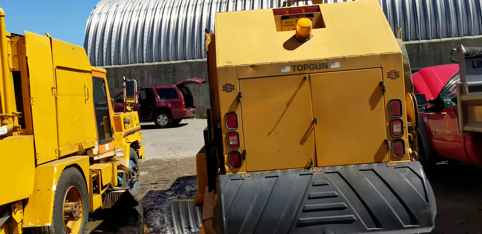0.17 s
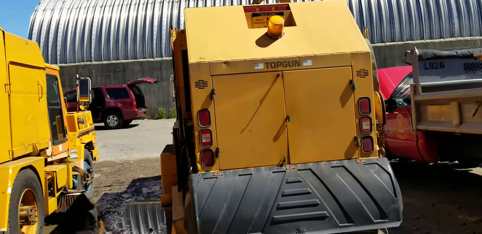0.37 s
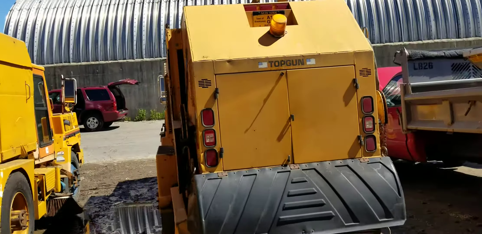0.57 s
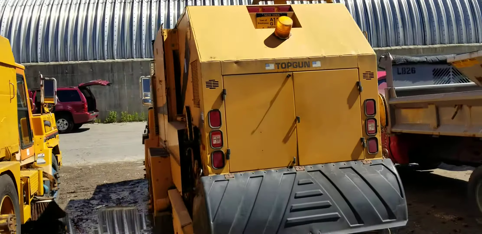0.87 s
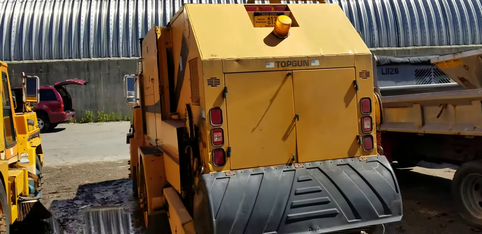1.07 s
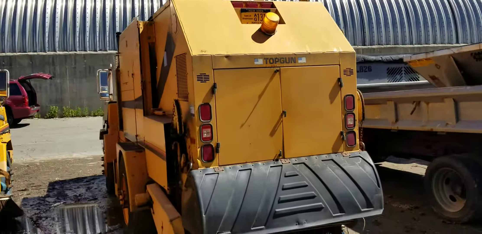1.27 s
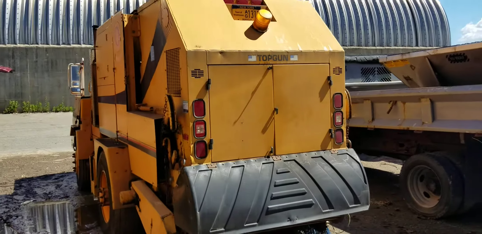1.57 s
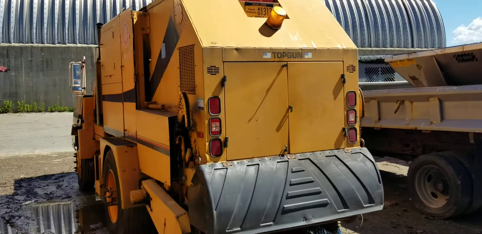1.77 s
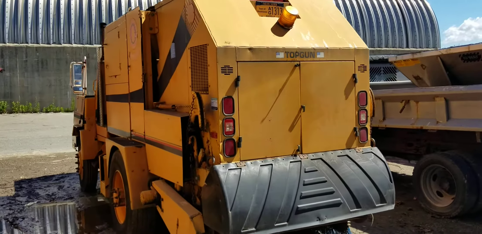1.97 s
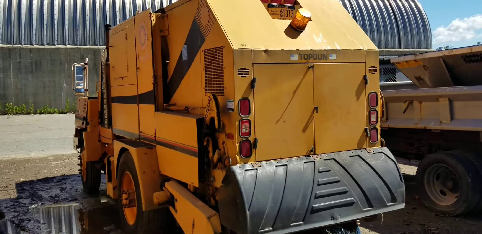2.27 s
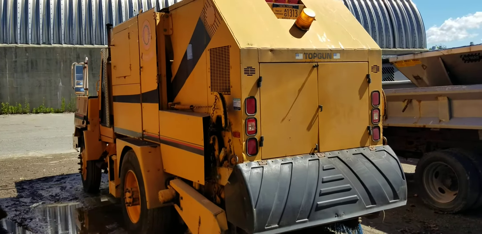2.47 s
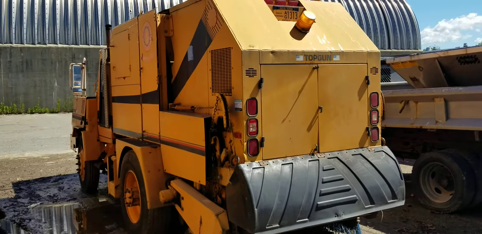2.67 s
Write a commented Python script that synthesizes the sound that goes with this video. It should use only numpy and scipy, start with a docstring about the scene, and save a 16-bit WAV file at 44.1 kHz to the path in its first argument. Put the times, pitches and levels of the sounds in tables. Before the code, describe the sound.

A steady diesel idle rumbles close by among parked street sweepers, with a second engine knocking to the right over fan noise. One short hiss of air escapes, followed by two faint puffs, while the microphone moves through the yard.

```python
"""Two diesels idling in a yard

Beside parked street sweepers, one engine throbs through its exhaust as its speed hunts slowly up and down.
To the right a steadier eight-cylinder knocks and clatters, louder as the microphone moves past.
Fan noise and yard echo lie behind them, and a few light ticks sound nearby.
Air escapes in one long hiss and two faint puffs."""
import sys
import numpy as np
from scipy import signal
from scipy.fft import rfft, irfft, next_fast_len
from scipy.io import wavfile

SR = 44100
rng = np.random.default_rng(int(sys.argv[2]) if len(sys.argv) > 2 else 0)


def generate_wav(signal):
    """Clip the signal to [-1, 1] and save it as 16-bit WAV at the path in sys.argv[1]."""
    frames = np.transpose(np.atleast_2d(signal))
    scaled = np.clip(frames, -1, 1) * 32767
    pcm = np.round(scaled).astype(np.int16)
    wavfile.write(sys.argv[1], SR, pcm)


N = 123921
TIME = np.arange(N) / SR
FFT_SIZE = next_fast_len(N)
BIN_HZ = np.fft.rfftfreq(FFT_SIZE, 1 / SR)


def amp(db):
    """Decibels to gain."""
    return 10 ** (np.asarray(db) / 20)


def unit(x):
    """Scales to rms 1."""
    return x / np.sqrt(np.mean(x ** 2) + 1e-20)


def curve(rows):
    """Joins (time, value) rows by straight lines."""
    return np.interp(TIME, *np.transpose(rows))


def bell(peak_s, spread_s):
    """A swell that peaks at 1 and is down to 1/e one spread either side."""
    return np.exp(-((TIME - peak_s) / spread_s) ** 2)


def over_bins(rows):
    """Reads (frequency, value) rows at every frequency bin."""
    hz, value = np.transpose(rows)
    return np.interp(np.log(BIN_HZ + 1), np.log(hz), value)


def filtered(x, gain):
    """Applies one gain per frequency bin."""
    return irfft(rfft(x, FFT_SIZE) * gain, FFT_SIZE)[..., :N]


def colour(x, spectrum, pan=((1, 0), (2, 0))):
    """Gives a sound its spectrum and left-right balance, at rms 1."""
    side = over_bins(pan) / 2
    return unit(filtered(x, amp(over_bins(spectrum) + np.array([side, -side]))))


def drift(hz):
    """Random wandering of rms 1, up to the given rate."""
    t = np.linspace(0, N / SR, 600)
    rates, phases = hz * rng.random((24, 1)), rng.random((24, 1))
    return np.interp(TIME, t, unit(np.sin(2 * np.pi * (rates * t + phases)).sum(0)))


def add(mix, s, sound):
    """Mixes a sound in at a time."""
    part = mix[..., max(round(s * SR), 0):][..., :sound.shape[-1]]
    part += sound[..., :part.shape[-1]]


def tone(turns):
    """A sine of rms 1 with a random start."""
    return np.sqrt(2) * np.sin(2 * np.pi * (turns + rng.random()))


def reflected(x, depth_db=0.83, band_hz=70):
    """Reflections off nearby panels raise and lower narrow bands above the bass."""
    ripple = np.interp(BIN_HZ / band_hz, np.arange(1024), rng.standard_normal(1024))
    return filtered(x, amp(depth_db * ripple * np.minimum(BIN_HZ / 2000, 1)))


# speed of the hunting engine (time [s], four-stroke cycle rate [Hz])
CYCLE_RATE = [(0.0, 9.775), (0.17, 9.762), (0.62, 9.483), (1.0, 9.705), (1.36, 9.933), (1.65, 9.751),
              (1.95, 9.525), (2.3, 9.762), (2.6, 9.907), (2.8, 9.768)]
# exhaust tones that swell and fade as the microphone moves
# (order [multiple of the cycle rate], peak level [dB], peak time [s], spread [s])
EXHAUST_TONES = [(4,-40,1.4,1),(6,-37,1.7,.3),(7,-46,.5,2),(8,-36,.4,.4),(10,-30,.1,.9),(11,-33.5,.4,1.2),(12,-35,2.7,1.2),(15,-37,1.9,.4),(16,-39,1.2,2),(17,-47,1.6,2),(18,-44,1.2,2),(19,-36,2.7,.35),(20,-40,2.3,2),(22,-42,1.3,1),(23,-43,1.1,.6),(24,-42,1.6,2),(25,-38,.6,.55),(26,-44,0,.3),(27,-42,2.15,.35),(28,-52,1.1,2),(32,-54,1.3,2),(33,-46,.9,.45),(35,-47,1.6,.3),(37,-45,1.9,.25),(38,-49,.1,.3)]
# boom of the pipe (time [s], level of order 9 [dB], level of order 13 [dB], level of order 14 [dB])
PIPE_BOOM = [(0,-31.5,-25,-39),(.35,-31,-24.5,-35),(.55,-29,-20.5,-34),(1.0,-30,-23.5,-33.5),(1.22,-32,-25,-33),(1.45,-33.5,-28,-41),(1.75,-32.5,-25.5,-41),(2.1,-30,-29.5,-45),(2.3,-30.5,-22.5,-44),(2.8,-32,-23,-40)]
BOOM_ORDERS, IN_STEP_ORDERS = (9, 13, 14), (12, 13, 14)
# turbulent exhaust flow (frequency [Hz], relative level [dB])
RUMBLE_SPECTRUM = [(20,-44),(30,-25),(42,-2),(60,3),(100,-9),(150,2),(230,-11.5),(290,-10),(350,-11.5),(480,-17.5),(800,-29),(2000,-69)]

def hunting_engine(strong_firing_s=0.09, fade_db=-10.5, rumble_db=-32, puff_depth=0.44, width=0.35):
    """Centre: uneven firings give tones over puffs of gas; those near pipe resonance throb each cycle."""
    cycles = np.cumsum(curve(CYCLE_RATE)) / SR - strong_firing_s * CYCLE_RATE[0][1]
    times, *levels = np.transpose(PIPE_BOOM)
    loud = [(order, np.interp(TIME, times, db)) for order, db in zip(BOOM_ORDERS, levels)]
    soft = [(order, db + fade_db * (1 - bell(s, spread))) for order, db, s, spread in EXHAUST_TONES]
    tones = np.zeros(N)
    for order, db in loud + soft:
        turns = order * cycles
        wave = np.sqrt(2) * np.cos(2 * np.pi * turns) if order in IN_STEP_ORDERS else tone(turns)
        tones += amp(db) * wave
    gas, side = rng.standard_normal((2, N))
    firing = np.cos(8 * np.pi * cycles)  # four firings a cycle
    puffs = (1 + puff_depth * firing) * (gas + width * np.array([side, -side]))
    return amp(1.07 * drift(hz=16)) * tones + amp(rumble_db) * colour(puffs, RUMBLE_SPECTRUM)


FIRING_HZ = 46.848
FIRINGS = int(N / SR * FIRING_HZ) + 1
# hum of the eight-cylinder (harmonic [multiple of the firing rate], level [dB])
FIRING_HUM = [(1,-36.5),(2,-47),(3,-47),(4,-52),(5,-53),(9,-52)]
# clatter of the block (frequency [Hz], relative level [dB])
CLATTER_SPECTRUM = [(25,-64),(150,-19),(350,4.5),(600,1.5),(780,-1.5),(1200,0.5),(1450,-4),(1700,0),(2100,-6.5),(2550,-7),(3200,-14.5),(4300,-15),(5200,-24),(7300,-24),(8600,-40),(15500,-47)]
# the clatter as the microphone moves past (time [s], level [dB])
BLOCK_LEVEL = [(0,-42),(.7,-42),(1.5,-41.5),(2.0,-38.5),(2.8,-38.5)]
# where the clatter sits (frequency [Hz], left minus right [dB])
CLATTER_BALANCE = [(400,-1),(700,3),(1200,-10),(2400,-11.5),(4400,-6.5),(8000,7)]

def steady_engine(cylinders=8, ring_s=0.015, rattle_s=0.027, rise_s=0.00068, scatter_db=1.2):
    """A low hum; mostly to the right, each cylinder knocks the block with its own ring and fresh rattle."""
    ring_share, diffuse_share, right_lag_s = 0.23, 0.24, 0.00019
    hum = sum(amp(db + drift(hz=1.52)) * tone(k * FIRING_HZ * TIME) for k, db in FIRING_HUM)
    t = np.arange(2048) / SR
    rings = rng.standard_normal((cylinders, 3, len(t))) * np.exp(-t / ring_s)
    knocks = np.zeros((3, N))  # direct, diffuse left, diffuse right
    for k in range(FIRINGS):
        rattle = rng.standard_normal((3, len(t))) * np.exp(-t / rattle_s)
        attack = amp(scatter_db * rng.standard_normal()) * (1 - np.exp(-t / rise_s))
        knock = np.sqrt(ring_share) * rings[k % cylinders] + np.sqrt(1 - ring_share) * rattle
        add(knocks, 0.003 + k / FIRING_HZ, attack * knock)
    direct = np.array([knocks[0], np.interp(TIME - right_lag_s, TIME, knocks[0])])
    at_mic = np.sqrt(1 - diffuse_share) * direct + np.sqrt(diffuse_share) * knocks[1:]
    return hum + amp(curve(BLOCK_LEVEL)) * colour(reflected(at_mic), CLATTER_SPECTRUM, CLATTER_BALANCE)


# how each cylinder rings the block, in firing order (low mode gain [dB], high mode gain [dB])
CYLINDER_GAINS = [(-4,5.5),(3.5,0),(-1,2.5),(2,.5),(-9,-.5),(1,-.5),(1.5,-.5),(-1,1.5)]
# firings that knock harder (time [s], extra low mode gain [dB])
HARD_FIRINGS = [(2.077,4),(2.247,3),(2.288,4),(2.336,4),(2.509,7),(2.568,6),(2.781,5)]

def block_pings(modes_hz=(1182, 1650), rise_s=0.0012, decay_s=0.0077, gain_db=-2, left_db=-11):
    """On the right, each firing rings two modes of the block, in a pattern that repeats every cycle."""
    t, out = np.arange(1500) / SR, np.zeros((2, N))
    envelope = (1 - np.exp(-t / rise_s)) * np.exp(-t / decay_s)
    envelope /= envelope.max()
    extra_db = {int(s * FIRING_HZ): db for s, db in HARD_FIRINGS}
    for k in range(FIRINGS):
        low_db, high_db = CYLINDER_GAINS[k % len(CYLINDER_GAINS)]
        for hz, db in zip(modes_hz, (low_db + extra_db.get(k, 0), high_db)):
            detune, scatter_db = rng.standard_normal(2)
            ring = np.array([tone(hz * (1 + 0.037 * detune) * t) for _ in range(2)])
            add(out, 0.0055 + k / FIRING_HZ, amp(db + scatter_db) * envelope * ring)
    return amp(gain_db + curve(BLOCK_LEVEL)) * amp([[left_db], [0]]) * out


# fans and the echo of the yard (frequency [Hz], relative level [dB])
YARD_SPECTRUM = [(25,-46),(100,7),(330,-7.5),(550,3),(780,-2.5),(1200,-3),(1700,-2),(2100,-7),(2600,-8),(3300,-12),(4300,-15),(5200,-19.5),(7300,-22),(8700,-28.5),(12000,-25.5),(15500,-31)]
# how alike the two sides of the microphone hear them (frequency [Hz], correlation [-1 to 1])
YARD_CORRELATION = [(200,0.69),(550,0.97),(1000,0.35),(1700,-0.23),(4000,-0.14),(15000,-0.022)]
# whines and ringing panels (frequency [Hz], width [Hz], peak level [dB], peak time [s], spread [s])
YARD_WHINES = [(1297,14,-48.5,1.08,0.48),(2503,45,-55.5,1.5,2)]

def fans_and_yard(level_db=-38.5):
    """Fan noise and yard echo all round the microphone, wide in the treble, with two thin whines."""
    left, independent = rng.standard_normal((2, N))
    alike = over_bins(YARD_CORRELATION)
    right = filtered(left, alike) + filtered(independent, np.sqrt(1 - alike ** 2))
    out = amp(level_db + drift(hz=39.94)) * colour(reflected(np.array([left, right])), YARD_SPECTRUM)
    for hz, width, db, s, spread in YARD_WHINES:
        whine = np.array([drift(width / 2) * tone(hz * TIME) for _ in range(2)])
        out += amp(db) * bell(s, spread) * whine
    return out


# the clearer ticks (time [s], relative level [dB])
NEAR_TICKS = [(.059,-48),(.214,-53),(.415,-47),(.446,-47),(1.175,-50),(1.251,-51),(1.273,-44),(1.289,-52),(1.424,-49)]
# their brightness (frequency [Hz], gain [dB])
TICK_FILTER = [(2000,-20),(5000,14),(7500,15),(12000,10),(15500,9)]

def ticks(decay_s=0.0012, small_per_s=18, gain_db=-2.5):
    """A few light, dry ticks near the microphone, among a sprinkle of smaller ones."""
    t, out = np.arange(600) / SR, np.zeros((2, N))
    times = np.flatnonzero(rng.random(N) < small_per_s / SR) / SR
    small = [(s, rng.normal(-62, 3)) for s in times]
    for s, db in list(NEAR_TICKS) + small:
        add(out, s, amp(db + gain_db) * np.exp(-t / decay_s) * rng.standard_normal((2, len(t))))
    return filtered(out, amp(over_bins(TICK_FILTER)))


# the long hiss (time [s], level [dB])
HISS_LEVEL = [(.767,-80),(.772,-45),(.85,-41),(.878,-33.5),(.935,-34),(.97,-37),(1.015,-33),(1.05,-43),(1.12,-48.5),(1.3,-61),(1.42,-58.5),(1.7,-60)]
# its colour (frequency [Hz], relative level [dB])
HISS_SPECTRUM = [(400,-15),(1200,0),(2500,5),(3600,2.5),(4900,0.5),(6000,0.5),(7400,4),(8700,-3.5),(10500,-1),(12200,0.5),(13800,-2),(15700,0.5)]
# resonances of the jet (frequency [Hz], width [Hz], level against the hiss [dB])
JET_WHISTLES = [(5700,260,-12.5),(7200,420,-11.5)]
# where the hiss and puffs sit (frequency [Hz], left minus right [dB])
AIR_BALANCE = [(2000,-7.5),(4500,1),(8000,2.5),(13000,5)]
# roar of the first surge (frequency [Hz], relative level [dB])
SURGE_SPECTRUM = [(800,-22),(2600,2),(4200,-3),(6000,-8),(9000,-22)]
# faint puffs, the last two rows merging into one (time [s], level [dB], half length [s])
AIR_PUFFS = [(1.545,-48,0.024),(2.1,-52,0.087),(2.162,-41.5,0.028)]
# their colour (frequency [Hz], relative level [dB])
PUFF_SPECTRUM = [(400,-8),(1200,14),(2400,12),(3600,3),(5000,1),(7400,5),(8700,-5),(12200,-1),(15700,-4)]

def escaping_air(surge_s=0.895, surge_db=-40, surge_half_s=0.02, flutter_db=1.6):
    """Over the engines a fluttering, whistling jet opens abruptly, surges and dies; duller puffs follow."""
    noise = reflected(rng.standard_normal((2, N)))
    whistles = np.zeros((2, N))
    for hz, width, db in JET_WHISTLES:
        resonance = 1 / (1 + ((BIN_HZ - hz) / (width / 2)) ** 2)
        whistles += amp(db) * unit(filtered(rng.standard_normal((2, N)), resonance))
    hiss = amp(curve(HISS_LEVEL)) * (colour(noise, HISS_SPECTRUM, AIR_BALANCE) + whistles)
    puff_flow = sum(amp(db) * bell(s, np.sqrt(2) * half) for s, db, half in AIR_PUFFS)
    puffs = puff_flow * colour(noise, PUFF_SPECTRUM, AIR_BALANCE)
    surge_flow = amp(surge_db) * bell(surge_s, np.sqrt(2) * surge_half_s)
    surge = surge_flow * colour(rng.standard_normal((2, N)), SURGE_SPECTRUM)
    return amp(flutter_db * drift(hz=151)) * (hiss + puffs + surge)


def scene():
    """The yard as it reaches the microphone."""
    return hunting_engine() + steady_engine() + block_pings() + fans_and_yard() + escaping_air() + ticks()


def record(dry, edge_hz=15780):
    """The recorder's band limit."""
    lowpass = signal.firwin(2001, edge_hz, window=("kaiser", 9), fs=SR)
    return signal.oaconvolve(dry, lowpass[None], "same")


dry = scene()
out = record(dry)
generate_wav(out)
```